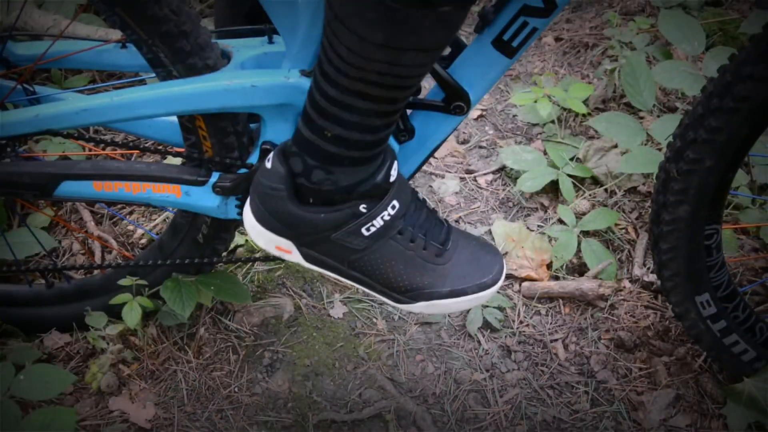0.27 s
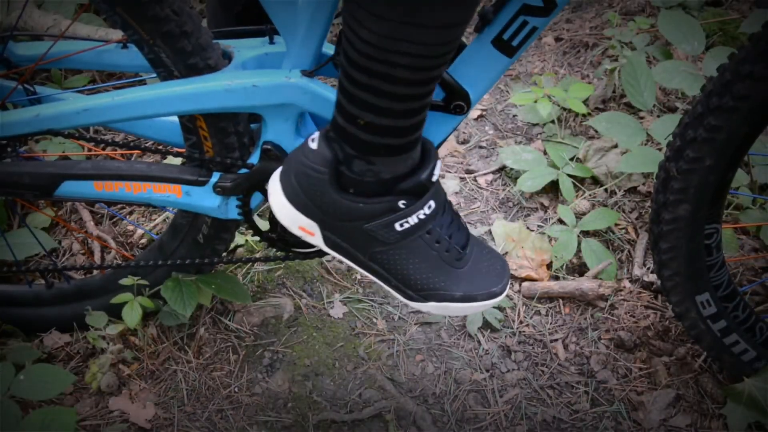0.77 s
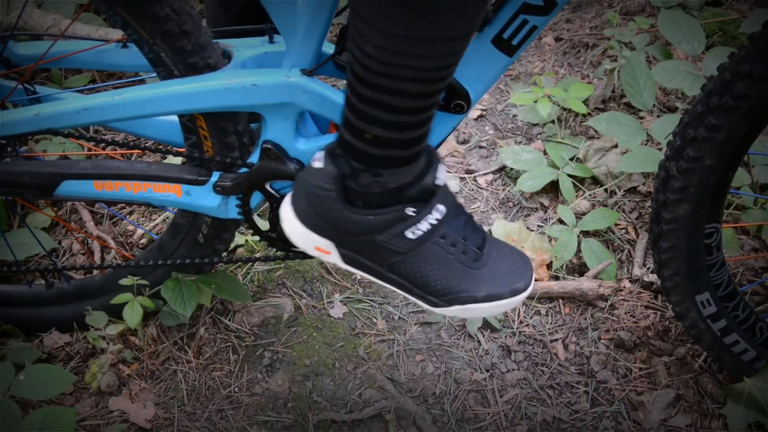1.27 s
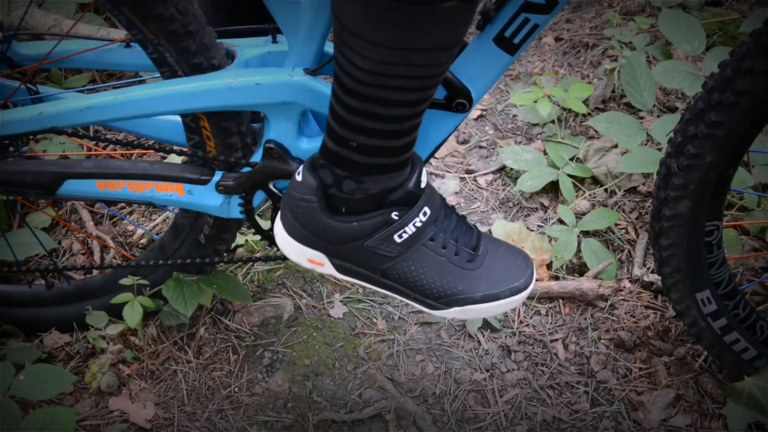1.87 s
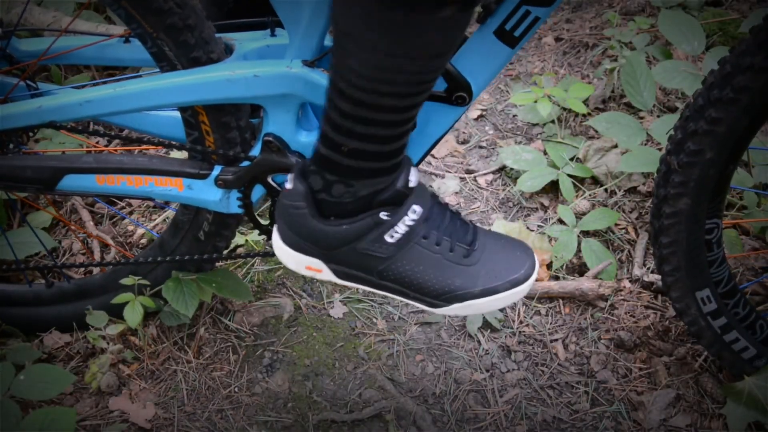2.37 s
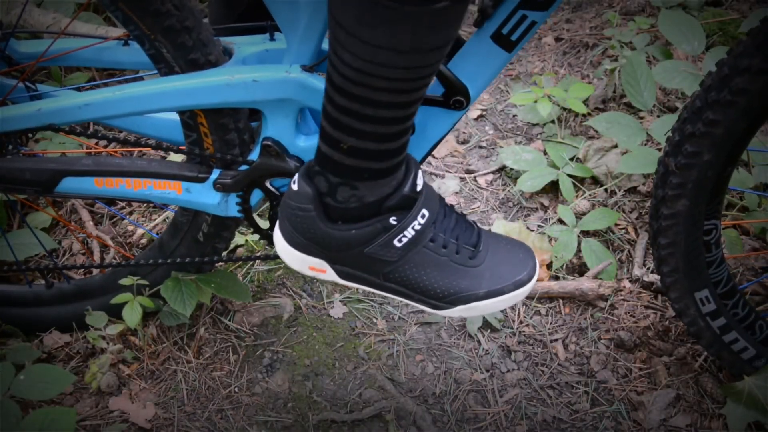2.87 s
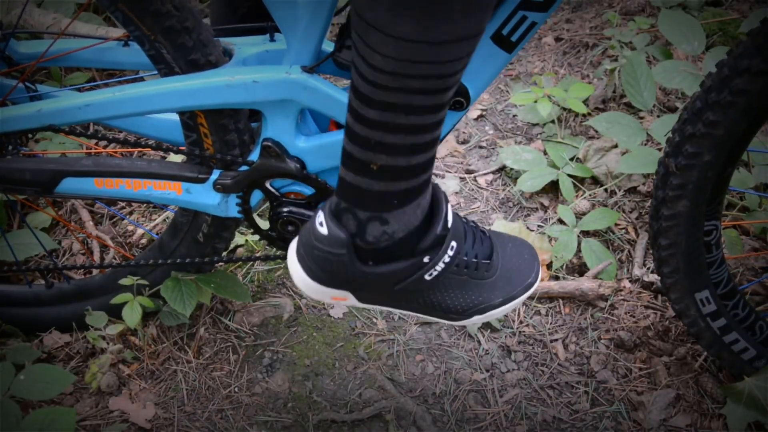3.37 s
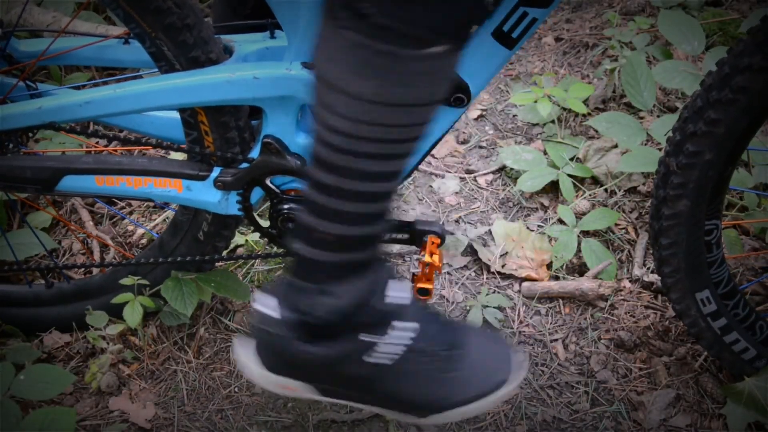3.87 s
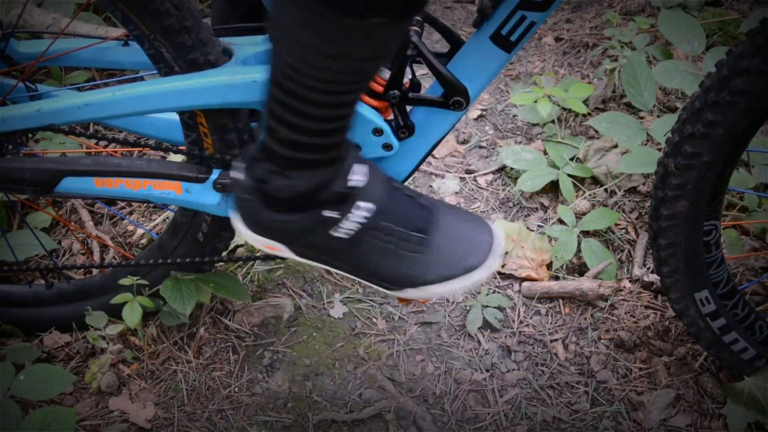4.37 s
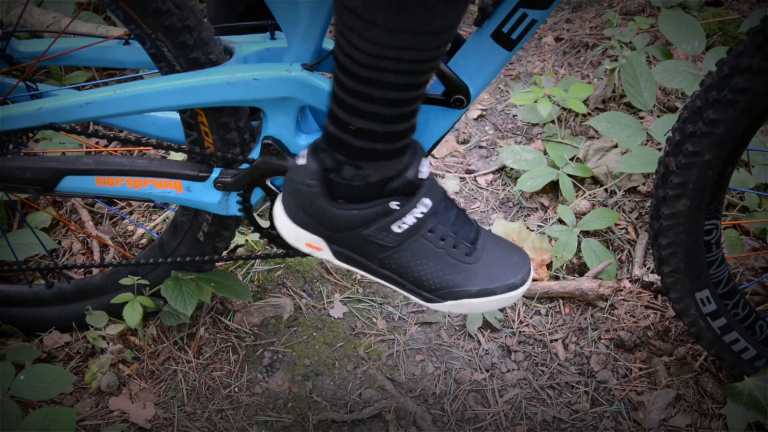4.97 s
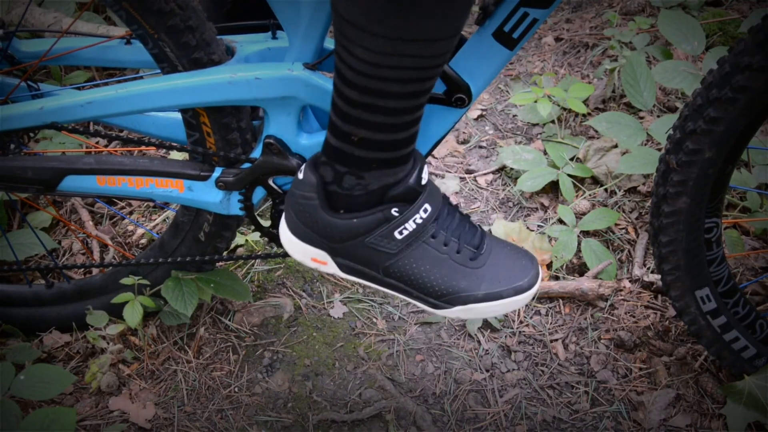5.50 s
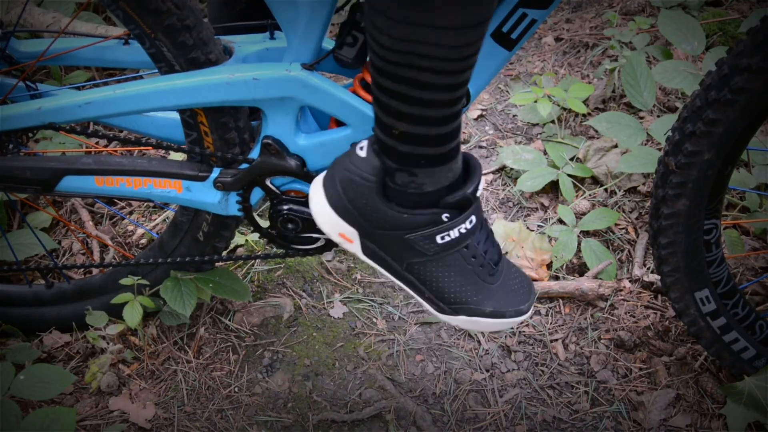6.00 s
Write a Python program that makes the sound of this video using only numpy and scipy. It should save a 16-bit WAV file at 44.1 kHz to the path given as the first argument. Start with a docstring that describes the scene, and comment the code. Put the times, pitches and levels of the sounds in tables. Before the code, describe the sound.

Irregular hard clicks and knocks of a shoe cleat on a spring-loaded bicycle pedal, one sharp metallic snap, over a steady distant-stream hiss outdoors.

```python
"""A cleated shoe works a spring-loaded bicycle pedal close to the microphone, on a forest trail.
Knocks are broadband contact forces plus dying modes of sole, frame and cleat; one hard snap twists the cleat out.
Taps ring the free pedal as a bank of modes, and a heavy knock clips the shoe in again; noise makes the faint
rubbing. The trees throw back a faint late echo, as decaying noise, over a steady hiss like a distant stream."""
import sys
import numpy as np
from scipy import signal
from scipy.fft import rfft, irfft
from scipy.io import wavfile
from scipy.ndimage import uniform_filter1d

SR = 44100
rng = np.random.default_rng(int(sys.argv[2]) if len(sys.argv) > 2 else 0)


def persist_wave(psi):
    """Save psi, clipped to +-1, as 16-bit WAV."""
    counts = np.round(np.clip(psi, -1, 1) * 32767).astype(np.int16)
    wavfile.write(sys.argv[1], SR, np.atleast_2d(counts).T)


N = 275184
T = np.arange(8192) / SR  # time within one blow (s)

# the spring jaw letting the cleat go: [t/s, level/dB, length of the full clash/s]
SNAP = (3.6888, -6.5, 0.0023)
# relative spectrum of the rubbing sole and the scrape: [f/Hz, level/dB]
RUB_COLOUR = [(300, -21), (2500, 1.5), (6000, -3.5), (8500, -3.5), (10500, -9.5), (15000, -9)]


def amp(db):
    """Level to amplitude: 20 dB is a factor of ten."""
    return 10 ** (np.asarray(db) / 20)


def evened(x):
    """Normalization: the root mean square becomes 1."""
    return x / np.sqrt(np.mean(x ** 2) + 1e-20)


def read(points, hz):
    """Interpolation: straight lines over log frequency join the points of a table."""
    f, value = np.transpose(points)
    return np.interp(np.log(hz + 1), np.log(f + 1), value)


def add(mix, s, sound):
    """Superposition: adds a sound to the mix, in place, from time s."""
    part = mix[max(round(s * SR), 0):][:len(sound)]
    part += sound[:len(part)]


def bins(x):
    """Discrete Fourier analysis: the frequencies (Hz) of the spectrum of x."""
    return np.fft.rfftfreq(x.shape[-1], 1 / SR)


def shaped(x, colour):
    """Linear filtering: multiplies the spectrum of a long sound by a table of gains."""
    return irfft(rfft(x) * amp(read(colour, bins(x))), x.shape[-1])


def dying(t60):
    """Exponential decay: the envelope falls 60 dB in t60 seconds."""
    return np.exp(-np.log(1000) * T / t60)


def pulse(colour):
    """Minimum phase: the sharpest causal pulse with a given spectrum, peak 1."""
    hz = abs(np.fft.fftfreq(len(T), 1 / SR))
    log_gain = np.log(amp(read(colour, hz)))
    # the Hilbert transform of the log gain gives the phase
    click = np.fft.ifft(np.exp(np.conj(signal.hilbert(log_gain)))).real
    return click / abs(click).max()


def ring(modes, length=1, detune=0):
    """Modal synthesis: sums damped sines of alternating sign, each detuned at random from blow to blow."""
    hz, db, t60 = np.transpose(modes)[:, :, None]
    hz = hz * (1 + detune * rng.standard_normal(hz.shape))
    sign = np.cos(np.pi * np.arange(len(hz)))[:, None]
    sines = np.sin(2 * np.pi * hz * T)
    return (sign * amp(db) * dying(t60 * length) * sines).sum(0)


def brighten(x, treble_db, corner_hz):
    """Contact stiffness: a harder contact lifts everything above the corner."""
    lowpass = signal.butter(1, corner_hz, fs=SR, output="sos")
    low = signal.sosfilt(lowpass, x)
    return low + amp(treble_db) * (x - low)


def chatter(envelope, order=6):
    """Random micro-impacts: noise of energy 1 under an envelope, whitened so that it favours no pitch."""
    grains = envelope * rng.standard_normal(len(T))
    for _ in range(order):  # alternately flatten the spectrum and restore the envelope
        white = irfft(np.exp(1j * np.angle(rfft(grains))))
        local_rms = np.sqrt(abs(uniform_filter1d(white ** 2, 64)) + 1e-14)
        grains = envelope * white / local_rms
    return grains / np.linalg.norm(grains)


def contact(force, colour):
    """Convolution: a contact force is heard through the impulse response of the parts it shakes."""
    return signal.fftconvolve(force, pulse(colour))[:len(T)]


def hiss(waver_db=0.63):
    """Partly coherent noise: a distant rushing, alike in both channels below the treble, wavering in level."""
    # relative power density: [f/Hz, level/dB]
    spectrum = [(15, -58), (25, -28), (80, -10), (175, -14), (309, -13), (677, -2.5), (1040, 1.5),
                (1650, -6.5), (2550, -19), (4610, -30.5), (13200, -38), (14800, -39.5), (16000, -45.5)]
    # left-right coherence: [f/Hz, correlation]
    coherence = [(60, 1), (180, 0.99), (550, 0.99), (1650, 0.96), (4970, 0.27), (15000, 0.31)]
    # left-right balance: [f/Hz, level difference/dB]
    balance = [(60, 1.5), (240, 1.5), (950, 1.6), (3770, 1.5), (15000, 0.0)]
    steady_db, fade_db, fade_s = -48, 14.5, 0.85  # fade-in: level reached, rise, duration
    fade_bend = 1.3  # exponent of the rise in dB; above 1 it starts slowly

    left, other = rfft(rng.standard_normal((2, N)))
    t = np.arange(N) / SR
    hz = bins(t)
    same = np.clip(read(coherence, hz), -1, 1)
    right = same * left + np.sqrt(1 - same ** 2) * other
    pair = np.array([left, right]) * amp(np.outer([.5, -.5], read(balance, hz)))
    # slow sines of random phase, 1 to 14 Hz
    waver = evened(sum(np.sin(2 * np.pi * (f * t + rng.random())) for f in np.geomspace(1, 14, 20)))
    rise_db = fade_db * (np.minimum(t / fade_s, 1) ** fade_bend - 1)
    return evened(shaped(irfft(pair, N), spectrum)) * amp(steady_db + rise_db + waver_db * waver)


def forest(x, echo_db=-19.5, apart=0.32):
    """Diffuse scattering: ground and bike answer first, trunks near 70 ms, and the far wood fades last."""
    # relative colour of the echo: [f/Hz, level/dB]
    echo_colour = [(100, -9.5), (600, -6), (3000, -6.5), (10000, -4), (15000, -10.5)]
    # levels are relative to the far wood
    near_s, near_db, near_t60 = 0.0048, 18.5, 0.14  # ground and bike: first arrival (s), dB, s
    trunks_s, trunks_spread_s, trunks_db = .072, .024, 1.5  # nearest trunks: delay (s), spread (s), dB
    wood_t60 = 1  # far wood (s)

    t = np.arange(SR * 2 // 3) / SR
    near = amp(near_db) * np.exp(-np.log(1000) * t / near_t60)
    trunks = amp(trunks_db) * np.exp(-((t - trunks_s) / trunks_spread_s) ** 2)
    wood = np.exp(-np.log(1000) * t / wood_t60) * np.minimum(t / trunks_s, 1)
    shared, side = rng.standard_normal((2, len(t)))
    tail = shaped(np.array([shared + apart * side, shared - apart * side]), echo_colour)
    tail *= np.sqrt(near ** 2 + trunks ** 2 + wood ** 2) * (t > near_s)  # powers add
    tail /= np.linalg.norm(tail[0])
    return amp(echo_db) * signal.fftconvolve(x[None], tail, axes=1)[:, :N]


def ports(x):
    """Interchannel difference: two close microphone ports differ slightly in level, and in treble phase."""
    # left-right level: [f/Hz, difference/dB]
    port_side = [(60, 0.0), (180, 1.0), (550, 1.5), (1650, 1.0), (4970, 0.5), (15000, 0.0)]
    # left-right phase: [f/Hz, difference/rad]
    port_phase = [(0, 0), (8440, -0.0), (9390, 0.2), (10200, -0.2), (10500, 0.6), (11600, -0.9),
                  (12800, 1.9), (13400, -0.1), (15000, -1.9), (16100, 0.5)]
    hz = bins(x)
    half = np.array([[1], [-1]]) / 2  # each port takes half of the difference
    gain = amp(half * read(port_side, hz))
    turn = np.exp(1j * half * read(port_phase, hz))
    return irfft(rfft(x) * gain * turn, N)


def rub(grain_db=2.5):
    """Sliding friction: faint gritty noise of the sole whose amplitude follows the speed of each foot shift."""
    # the foot shifting, each move swelling and easing off: [start t/s, length/s, peak level/dB]
    shifts = [(1.253, 0.72, -66), (1.94, 0.6, -65), (3.188, .25, -64), (3.44, .19, -63.5),
              (4.147, 0.2, -69), (5.48, .22, -71), (5.741, 0.21, -65.5)]
    rest_db = -76.5  # the sole never lies quite still
    speed = np.full(N, amp(rest_db))
    for s, length, db in shifts:
        swell = np.sin(np.pi * np.arange(0, length, 1 / SR) / length)
        add(speed, s, (amp(db) - amp(rest_db)) * swell)
    grit = rng.standard_normal(N) * amp(grain_db * np.minimum(rng.exponential(1, N), 6))
    return speed * evened(shaped(grit, RUB_COLOUR))


def squeak(scrape_db=-44, scrape_t60=0.15, waver_hz=50):
    """Frictional slip: the cleat scrapes the spring in thin tones of unsteady pitch over a dry noise."""
    # short slips: [t/s, f/Hz, level/dB]
    slips = [(1.234, 5930, -50), (1.253, 5900, -59), (1.278, 5800, -60)]
    slip = np.sin(np.pi * np.arange(SR // 45) / (SR // 45))
    out = np.zeros(N)
    for s, hz, db in slips:
        waver = evened(uniform_filter1d(rng.standard_normal(len(slip)), size=120))
        phase = 2 * np.pi * np.cumsum(hz + waver_hz * waver) / SR
        add(out, s, amp(db) * slip * np.sin(phase))
    scrape = evened(shaped(rng.standard_normal(len(T)), RUB_COLOUR))
    scrape *= dying(scrape_t60) * (1 - dying(0.012))
    add(out, slips[0][0] - .004, amp(scrape_db) * scrape)
    return out


def coils():
    """High modal density: crowded modes of the spring's coils shimmer on as narrow noise after the snap."""
    # clusters of modes: [f/Hz, width/Hz, level/dB, t60/s]
    clusters = [(3100, 700, -48.5, .5), (4300, 1400, -49.5, .55), (5340, 300, -46.5, .62),
                (6800, 1400, -49, .55), (8480, 700, -47, .55), (11150, 900, -49, .5),
                (13500, 1500, -52, .5)]
    t = np.arange(SR) / SR
    out = np.zeros(N)
    for hz, width, db, t60 in clusters:
        resonance = 1 / (1 + ((bins(t) - hz) / (width / 2)) ** 2)
        cluster = irfft(rfft(rng.standard_normal(SR)) * resonance)
        add(out, SNAP[0], amp(db) * evened(cluster) * np.exp(-np.log(1000) * t / t60))
    return out


def taps(tick_db=6.0, tick_t60=0.047, ring_db=-5.5):
    """Free vibration: light steel-on-steel ticks leave the pedal cage ringing in its own modes."""
    # taps: [t/s, level/dB, treble/dB, factor on the decay times]
    touches = [(0.0500, -44.5, 0.5, 0.82), (0.2098, -32.5, 2.5, 0.88), (0.2383, -30, -10, 0.69),
               (0.3059, -35.5, -3.5, 0.25), (1.0915, -48.5, 10, 0.35), (1.2975, -30.5, 1.5, 0.33),
               (2.0822, -36, 7.5, 0.49), (2.4370, -46, 0, 0.47), (3.0753, -52, 12.5, .4),
               (4.1060, -25, 2, 1), (4.1385, -21, -20, 0.95), (4.2006, -14.5, -2.5, 0.81)]
    # relative spectrum of the contact: [f/Hz, level/dB]
    tap_colour = [(100, -34), (600, -25), (1400, 9.5), (4000, -0.5), (8500, 2), (9800, -2.5), (13500, -1.5),
                  (15500, -3)]
    # modes of the free pedal, before the decay factor: [f/Hz, level/dB, t60/s]
    pedal_modes = [(1370, -15, 0.13), (1613, -13, 0.054), (1840, -22, 0.062), (2740, -11.5, 0.072),
                   (2934, -9, 0.039), (3740, -8.5, 0.016), (4420, -21, 0.053), (5070, -17, 0.058),
                   (6350, -13.5, 0.028), (6800, -25, 0.028), (7400, -6, 0.012), (8680, -8.5, 0.012)]
    out = np.zeros(N)
    for s, db, treble_db, length in touches:
        tick = amp(tick_db) * contact(chatter(dying(tick_t60 * length)), tap_colour)
        tick = brighten(tick, treble_db, corner_hz=6000)
        clink = amp(ring_db) * ring(pedal_modes, length, detune=0.0083)
        add(out, s, amp(db) * (tick + clink))
    return out


def snap(clash_db=19, clash_t60=0.017, buzz_db=7, buzz_t60=0.1, ring_db=1.0):
    """Release of stored energy: the jaw clashes on its stop for some milliseconds, then buzzes and rings."""
    # relative spectrum of the contact: [f/Hz, level/dB]
    snap_colour = [(40, -32), (150, -9.5), (350, -2), (700, 0), (1700, 1), (3100, 2), (3550, -4.5),
                   (4100, 5), (7000, 0), (11000, 0), (12700, -1.5), (15000, -8)]
    # modes of the spring jaw: [f/Hz, level/dB, t60/s]
    jaw_modes = [(600, -22, .07), (1391, -23, .06), (1690, -9, .018), (3005, -12, .03), (3975, -18, .03),
                 (4660, -19, .03), (5420, -11, .045), (6280, -20, .03), (8200, -20, .04), (8555, -14, .035),
                 (11090, -18, .03), (11175, -19, .04), (12400, -23, .03), (13580, -22, .03)]
    s, db, length = SNAP
    # full strength for the length of the clash, then decay
    held = np.minimum(1, dying(clash_t60) * np.exp(np.log(1000) * length / clash_t60))
    force = amp(clash_db) * chatter(held) + amp(buzz_db) * chatter(dying(buzz_t60))
    out = np.zeros(N)
    add(out, s, amp(db) * (contact(force, snap_colour) + amp(ring_db) * ring(jaw_modes)))
    return out


def knocks(slide_s=.0022, slide_db=-13, crunch_t60=.013, grind_db=-11, grind_t60=.04, rattle_db=-17,
           rattle_t60=0.069, sole_db=-8, sole_t60=0.02, focus_db=6):
    """Impact excitation: the cleat slides, hits home and crunches grit; sole, frame and metal ring, damped."""
    # cleat on pedal: [t/s, level/dB, sole thud/dB, pedal-body clack/dB, treble/dB, sole pitch f/Hz]
    blows = [(0.2413, -23.5, -8, 2, 1, 800), (1.1950, -38, 5, 0, -7, 735), (1.207, -20, 2, -3, -1, 660),
             (1.225, -29, 11, 7, 10.5, 680), (2.1303, -16, 9.5, -2, -1, 580),
             (2.1413, -13, -8, -20, -4, 580), (2.1512, -1.5, -6, -18, -10, 730),
             (3.7215, -26, 4, -15, -5.5, 804), (4.513, -27, 10, -20, 0.5, 850),
             (4.5223, -27.5, 4, -11, 8, 825), (4.531, -18.5, 8, -26, 12, 960),
             (4.7870, -39.5, 8, -5, -7, 400), (4.8405, -26, 0, -10, -5, 920),
             (5.0287, -24.5, 6, -8, -3, 1230), (5.3913, -26.5, 4, -17, 0.5, 520),
             (5.4173, -3, -4, -0.5, 1.5, 467), (5.9438, -35, -6, -13, -10, 801)]
    # relative spectrum of the contact: [f/Hz, level/dB]
    knock_colour = [(50, -44), (180, -27), (350, -8), (700, -2), (1000, -5.5), (1400, 2), (2000, 0),
                    (3100, 2), (4200, -14), (5700, -17), (7200, -16), (10000, -23), (15000, -30)]
    # modes of the shoe pressed on crank and frame, before focusing: [f/Hz, level/dB, t60/s]
    frame_modes = [(360, -17.5, 0.055), (400, -23.5, 0.073), (533, -24, 0.08), (580, -15, 0.062),
                   (690, -18.5, 0.066), (829, -24.5, 0.15), (1030, -28, 0.027), (1338, -23, 0.14)]
    # modes of the pedal body, damped by the foot: [f/Hz, level/dB, t60/s]
    body_modes = [(1418, -10.5, 0.01397), (1595, -21, 0.039), (2600, -14.5, 0.0085), (2870, -4, 0.013),
                  (3455, -13.5, 0.011)]
    # modes of the cleat: [f/Hz, level/dB, t60/s]
    cleat_modes = [(6350, -26.5, 0.027), (6920, -14.5, 0.015), (7620, -26, 0.024), (8540, -19.5, 0.012)]
    # grit gives way under a hard blow: share at full force (dB), loss per dB of force
    crunch_full_db, crunch_yield = -8, 0.28
    # a light, glancing blow frees the cleat: share (dB), loss per dB of force, gain per dB of treble
    cleat_full_db, cleat_damping, cleat_edge = -12.5, 0.47, 1
    highpass = signal.butter(2, 260, "high", fs=SR, output="sos")

    out = np.zeros(N)
    for s, db, thud_db, clack_db, treble_db, sole_hz in blows:
        crunch_db = crunch_full_db - crunch_yield * db
        cleat_db = cleat_full_db - cleat_damping * db + cleat_edge * treble_db
        slide = amp(slide_db) * chatter((T / slide_s) ** 2 * (T < slide_s))
        crunch = amp(crunch_db) * chatter(dying(crunch_t60) * (1 - dying(crunch_t60)))
        settle = amp(grind_db) * chatter(dying(grind_t60)) + amp(rattle_db) * chatter(dying(rattle_t60))
        hit = np.roll((T == 0) + settle, round(slide_s * SR))  # a unit impulse ends the slide
        force = slide + np.roll(crunch, round(slide_s * SR / 2)) + hit
        crack = brighten(contact(force, knock_colour), treble_db, corner_hz=5000)

        sole = amp(sole_db) * dying(sole_t60) * np.sin(2 * np.pi * sole_hz * T)
        # the sole drives the frame modes nearest its own pitch
        driven = [(hz, mode_db - focus_db * np.log2(hz / sole_hz) ** 2, t60)
                  for hz, mode_db, t60 in frame_modes]
        thud = amp(thud_db) * (sole + ring(driven, detune=.008))
        thud *= 1 - dying(0.0071)  # rubber softens the start
        thud = signal.sosfilt(highpass, thud)  # small parts radiate little bass

        clack = amp(clack_db) * ring(body_modes, detune=.012)
        metal = clack + amp(cleat_db) * ring(cleat_modes, detune=.015)
        add(out, s - slide_s, amp(db) * (crack + thud))
        add(out, s, amp(db) * metal)
    return out


def scene():
    """Superposition: the direct sound of the pedal, its echo and the background."""
    pedal = knocks() + taps() + snap() + coils() + squeak() + rub()
    return ports(pedal) + forest(pedal) + hiss()


def record(dry):
    """Saturation and band limit: the loudest peaks flatten at full scale, then a lowpass cuts the top."""
    edge_hz = 15500
    clipped = dry / (1 + dry ** 6) ** (1 / 6)
    lowpass = signal.firwin(255, edge_hz, window=("kaiser", 9), fs=SR)
    return signal.oaconvolve(clipped, lowpass[None], "same")


dry = scene()
out = record(dry)
persist_wave(out)
```